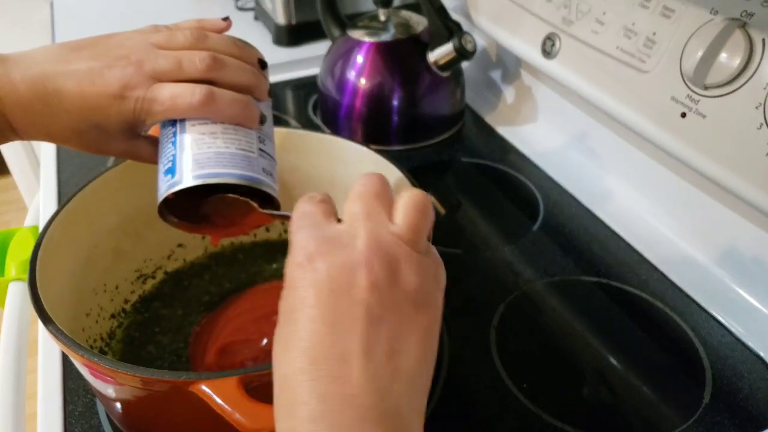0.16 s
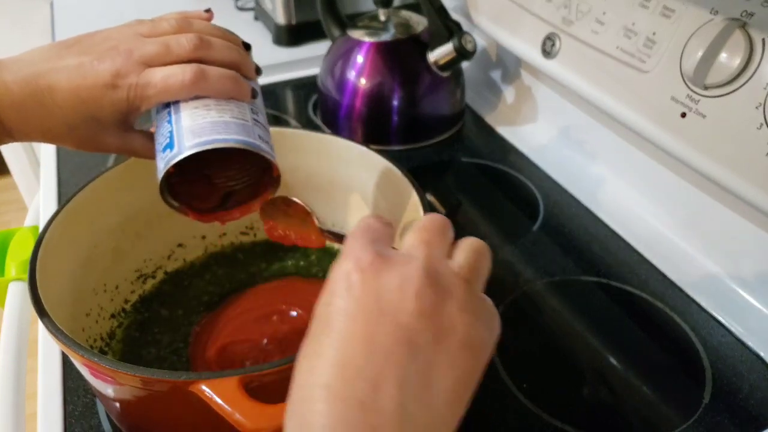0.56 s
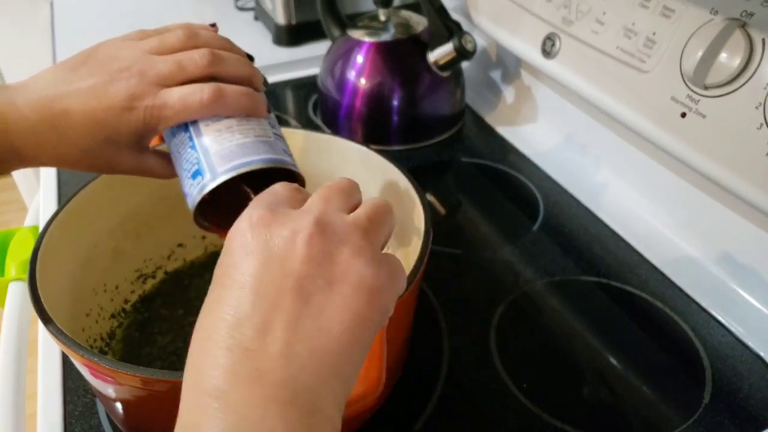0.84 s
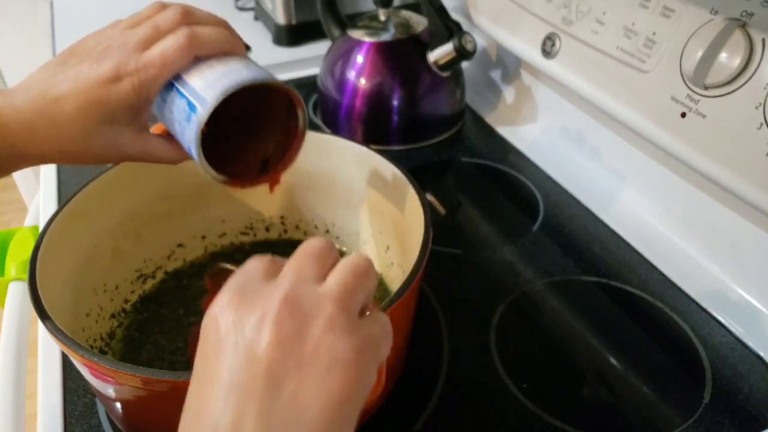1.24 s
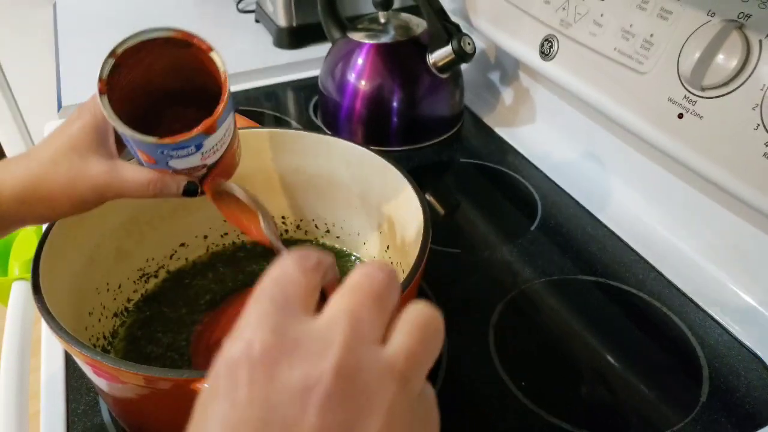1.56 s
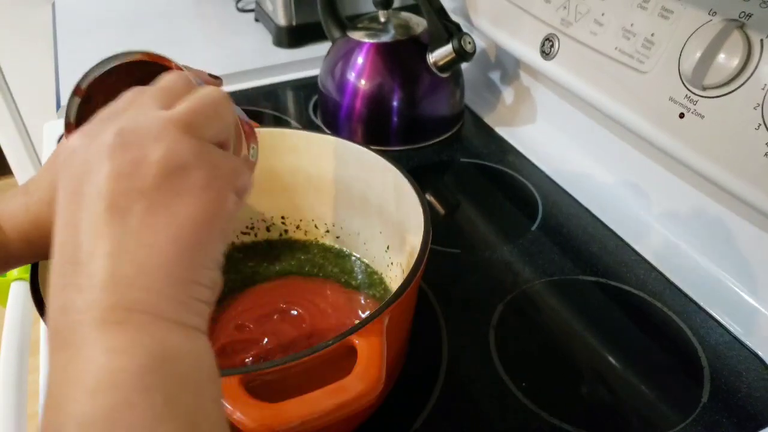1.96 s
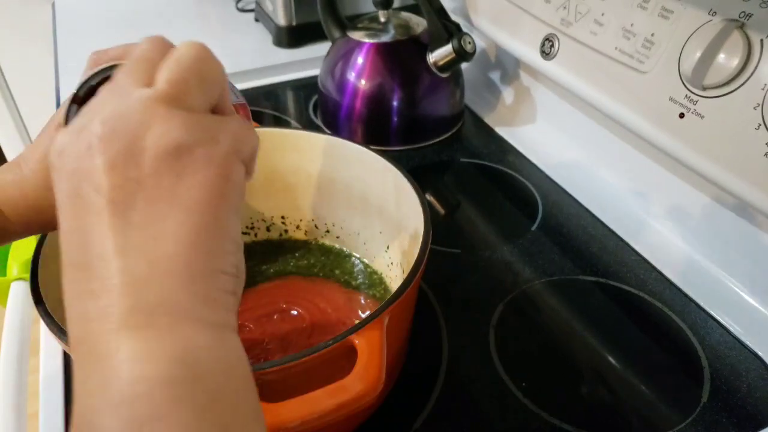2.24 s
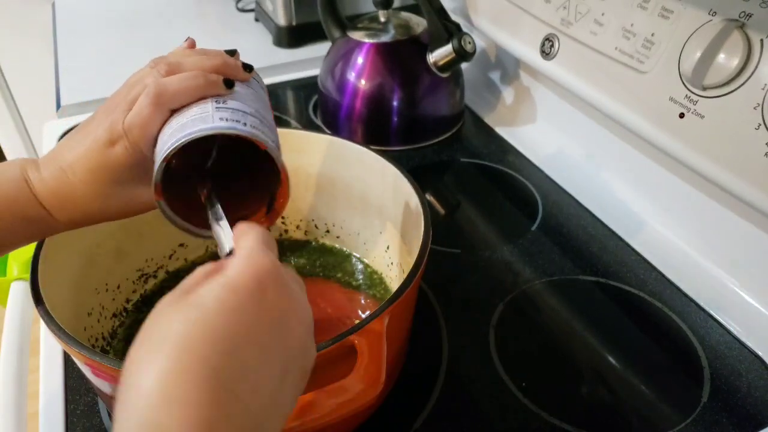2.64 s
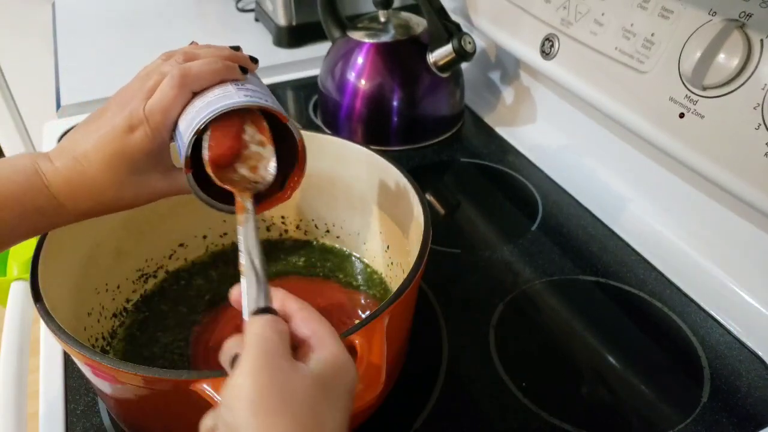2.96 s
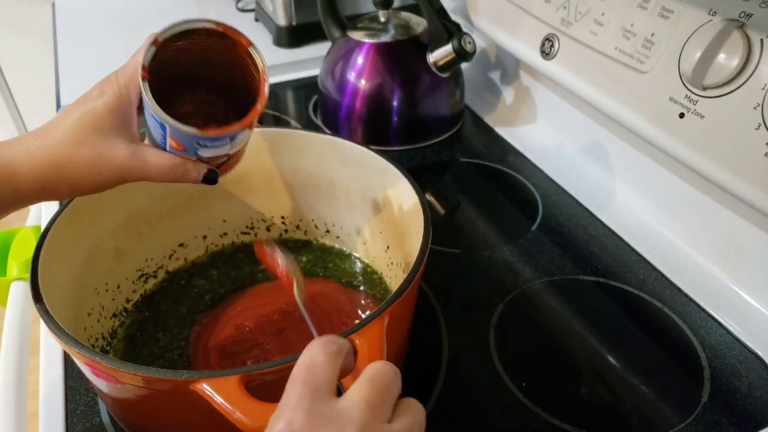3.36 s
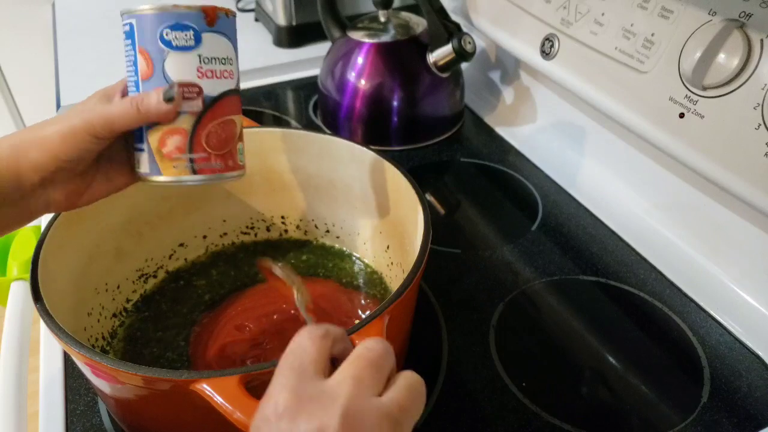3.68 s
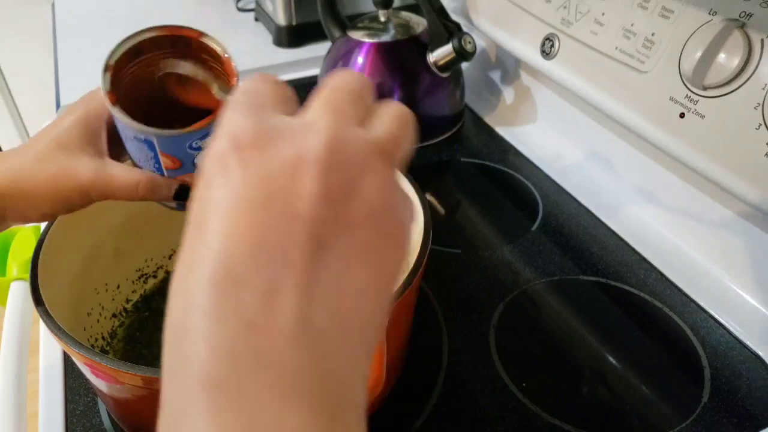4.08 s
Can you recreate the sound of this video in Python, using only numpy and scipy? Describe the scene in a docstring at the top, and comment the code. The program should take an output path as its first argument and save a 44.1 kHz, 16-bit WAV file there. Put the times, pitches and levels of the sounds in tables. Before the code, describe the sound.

In a small home kitchen, a spoon scrapes sauce from a tin can close to the microphone, with short gritty strokes and irregular hollow clinks. Strokes grow busier in the middle, with a brief rough squeal. After a pause, two much louder, bright clanks ring from an iron pot rim, then a final sharp knock on the can. Low stove hum and faint sizzle continue underneath.

```python
"""A spoon edge scrapes wet tin over a low stove hum and faint sizzle, while it also knocks about inside
a hand-held can. Strokes are random slips driving the can's resonances; knocks ring its modes, air column,
lid and wall. A short rough squeal comes midway. Later the spoon is rapped twice on the rim of an enamelled
iron pot, and one more can knock follows: wavering modes and clatter give the pot's ring and the thump of the
stove top. The stove is a wavering sine, coloured noise and pops; decaying noise adds a small kitchen."""
import sys
import numpy as np
from scipy import signal
from scipy.fft import rfft, irfft, next_fast_len
from scipy.io import wavfile
from scipy.ndimage import map_coordinates

SR = 44100
rng = np.random.default_rng(int(sys.argv[2]) if len(sys.argv) > 2 else 0)


def log_audio(samples):
    """Write samples as a 16-bit WAV file to the path given in sys.argv[1]."""
    # one column per channel
    frames = np.atleast_2d(samples).T
    # limit to full scale, then quantise
    limited = np.clip(frames, -1, 1)
    pcm = np.round(limited * 32767).astype(np.int16)
    wavfile.write(sys.argv[1], SR, pcm)


N = 185726  # length in samples

# Steady low sound of the stove: pitch_hz, relative density_db (per Hz)
STOVE_RUMBLE = [(15, -58), (25, -33), (40, -6), (56, 2.5), (78, -10.5), (104, -1), (140, -9.5),
                (220, -15.5), (330, -13), (465, -0.5), (620, -14), (800, -25), (970, -4.5), (1250, -32)]
# Fizz and pops of the hot pot: pitch_hz, relative density_db (per Hz)
POT_SIZZLE = [(300, -37), (1100, -9), (1450, 5.5), (1800, -2), (2500, 1), (4000, 0.5), (8000, -4.5),
              (13000, -4), (16000, -6.5)]
# Spoon dragged along the wall: start_s, length_s, strength_db, brightness_db (per octave), bareness_db
SPOON_STROKES = [(0, 0.037, -54, -1.5, 2.5), (.383, 0.059, -48.5, 1.5, -7.5), (.691, 0.17, -60, -0.5, 18),
                 (.775, .1, -50.5, 2.5, 4.5), (1.008, 0.055, -46.5, 0, -7), (1.198, 0.042, -41, -1.6, 5.5),
                 (1.954, 0.1, -41.5, 2, 2.5), (2.175, 0.053, -47, 0.5, 2), (2.345, .1, -45.5, -1.5, 1),
                 (2.449, 0.1, -55, 0.5, -2), (2.563, 0.138, -57.5, 1, 0), (2.683, 0.091, -47, 0, 0),
                 (2.76, 0.25, -52.5, -1.5, -6.5), (2.99, 0.088, -45, -0.5, -2.5),
                 (3.06, 0.061, -44.5, 2, -4)]
# Spoon edge over wet tin: pitch_hz, relative density_db (per Hz)
TIN_FRICTION = [(150, -3), (400, -4), (650, 3), (830, 0.5), (1150, -5), (1500, -5.5), (2500, 0), (4200, 2),
                (6000, -10.5), (9000, -7.5), (12500, -2.5), (16000, -13.5)]
# Can damped by hand and sauce: pitch_hz, relative level_db, t60_s (for knocks with a lifted spoon)
CAN_MODES = [(298, -7.5, 0.082), (471.4, -10.5, 0.18), (551, -10, 0.066), (649.2, 4, 0.11), (915, -6, 0.13),
             (986, -3.5, 0.087), (1117, 0, 0.035), (1154.4, -3, 0.16), (1930, -17, 0.2), (2175, -27, 0.2),
             (2244, -10.5, 0.21), (2484, -12.5, 0.2), (2880, -6.5, 0.18), (3340, -37, 0.052),
             (3568, -7, 0.1), (4156, -7.5, 0.065), (4580, -14, 0.06), (4950, -13, 0.015), (5580, -5, 0.063),
             (7310, -5.5, 0.07)]
# Spoon against the can; the air note is low when the spoon stays pressed on, high when it bounces off:
# start_s, strength_db, brightness_db (per octave), lid_db, air_hz, wall_hz (at the struck spot)
SPOON_KNOCKS = [(0.08, -32.5, 0.5, 0.5, 490, 1800), (0.13, -44.5, -4, -9, 600, 2950),
                (0.171, -47, -6.5, 2.5, 475, 2300), (0.682, -38, 3, -4, 664, 1893),
                (0.799, -44, -1, -10, 678, 1844), (0.875, -49, -2.2, -4.5, 487, 1750),
                (1.003, -51.5, -4.5, -3, 664, 2720), (1.151, -40.5, 0, -4.5, 675, 3020),
                (1.38, -73.5, 9, -10, 517, 2380), (1.953, -46, 2.5, -15, 667, 2153),
                (1.999, -41, 0.5, -24, 462, 2360), (2.035, -27.5, 3, 1, 456, 2322),
                (2.113, -34.5, -0.3, -9, 681, 1890), (2.161, -38, 0.3, -3.5, 737, 2396),
                (2.338, -41.5, -0.9, -7, 685, 2260), (2.409, -41.5, 3.1, -10, 648, 2015),
                (2.448, -41, 0.5, -14, 648, 1826), (2.535, -45, -1.5, -27, 477, 1880),
                (2.549, -39.5, 4, -30, 449, 1813), (2.688, -48, 2, -33, 670, 2425),
                (2.952, -49.5, -.3, -29, 683, 2180), (3.292, -81, 10, 2, 470, 2400),
                (4.185, -24.5, 0.5, -5, 668, 2970)]
# Partials of the struck wall: multiple of the wall note, relative level_db
STRUCK_WALL = [(0.998, 3), (1.971, 6.5)]
# Dense short-lived modes under the can's clear ones: pitch_hz, relative density_db (per Hz)
TIN_CLATTER = [(100, -8.5), (300, 1.5), (600, 7), (800, -2), (1100, -18), (1500, -8), (2200, -8), (4200, 2),
               (5500, -4), (9000, -4), (13000, 0.5), (16000, -4)]
# Rough squeal of the edge near one pitch: start_s, length_s, pitch_hz, level_db
EDGE_SQUEAK = (2.5, 0.14, 1930, -47)
# Spoon on the pot rim: start_s, level_db, then thump_db, low_ring_db, ring_db, tick_db against that level
RIM_RAPS = [(3.512, -6.5, -21.5, -38, -13, -23), (3.715, -6, -19, -36.5, -13, -23)]
# Pot, stove top and spoon ringing together: pitch_hz, relative level_db, t60_s
POT_MODES = [(54, -18, .5), (153, -2, .15), (181, -3, .3), (203, -9, .55), (390, -8, .07), (465, -1, .09),
             (479, -12, .7), (530, -7, .09), (587.5, -11, .6), (877, -30, .8), (1120, -24, .25),
             (1771, -20, .42), (2062, -14.5, .78), (2268, -11.5, .52), (2707, -14, .17), (2766, -2, .26),
             (3227, -7, .17), (3400, -15, .35), (3510, -15, .3), (3742, 2, .08), (4064, -10, .14),
             (4588, -4, .15), (4812, -3, .11), (5133, -8, .2), (5400, -5, .07), (5580, -4, .09),
             (6214, 3, .13), (6727, -11, .2), (6900, -7, .17), (12500, -10, .09)]
# Dense short-lived modes under the pot's clear ones: pitch_hz, relative density_db (per Hz)
IRON_CLATTER = [(60, -10), (110, -8.5), (175, 8.5), (260, -10.5), (480, 8.5), (900, -13.5), (1900, -9.5),
                (2500, -4.5), (3500, 7.5), (4250, -5.5), (5400, 3.5), (6900, -4.5), (7700, -8.5),
                (12800, 2.5), (16000, -11.5)]
# Bands whose strength a contact sets: low_hz, high_hz
CONTACT_BANDS = [(40, 800), (800, 1400), (1400, 7000), (7000, 18000)]
# Likeness of left and right: pitch_hz, correlation (-1 to 1)
STEREO_LIKENESS = [(100, 0.95), (300, 0.76), (700, 0.83), (1400, 0.12), (3000, -0.17), (7000, -0.038),
                   (15000, 0.0051)]
# Decay of the kitchen: pitch_hz, t60_s
KITCHEN_DECAY = [(150, 0.99), (600, 0.49), (2000, 0.53), (5000, 0.36), (9000, 0.28), (15000, 0.2)]

TOP_HZ = 15850  # the band limit, where the gain is halved
PIVOT_HZ = 1330  # brightness tips the sound about this pitch
TICK_DB = -11  # top register of a knock
WALL_T60_S, WALL_TOP_HZ = 0.06, 5200  # the sauce damps any wall partial above this pitch
CREST, SWELL_DB = 0.69, 6  # a stroke presses hardest at this share of its length, this much over its ends
SING_DB, SING_GROWS, SING_WIDTH_HZ = 3, .55, 67  # wall notes under a stroke; they grow per dB of bareness
SLIPS_PER_S, JUDDER_DB, JUDDER_PER_S = 3500, 1.5, 260  # grit: mean slip rate, random level depth, points a second
HOLLOW_HZ, HOLLOW_WIDTH_HZ, HOLLOW_DB = 665, 56, 14  # the air in the can hums under every stroke
AIR_DB, AIR_T60_S = 7.5, 0.077  # the can's air column under a knock; the tables set its pitch
LID_HZ, LID_DB, LID_T60_S = 1183, 6.5, 0.043  # the lid that closes the can's bottom
LOADED_UNTIL_S, LOADED_PITCH = .3, .79  # the first heavy spoonful lowers the lid note by this ratio
PRESSED_BELOW_HZ, PRESSED_RING = 560, 0.62  # a lower air note means a pressed spoon: can t60 cut to this share
RING_WAVER, WAVER_PER_S = 0.24, 35.4  # pot modes waver randomly: depth as a share, random points a second


def amp(db):
    """Decibels to gain."""
    return 10 ** (np.asarray(db) / 20)


def unit(x):
    """Scale to rms 1."""
    return x / np.sqrt(np.mean(x ** 2) + 1e-20)


def along(points, hz):
    """Read (Hz, value) points on a log pitch axis."""
    f, value = np.transpose(points)
    return np.interp(np.log(hz + 1), np.log(f + 1), value)


def wobble(rate, size):
    """A smooth random curve through rate random points a second."""
    knots = rng.standard_normal(int(size * rate / SR) + 4)
    return map_coordinates(knots, [np.arange(size) * rate / SR])


def filtered(x, response):
    """Shape x by a complex response of frequency."""
    size = x.shape[-1]
    padded = next_fast_len(size + SR // 4)
    spectrum = rfft(x, padded) * response(np.fft.rfftfreq(padded, 1 / SR))
    return irfft(spectrum, padded)[..., :size]


def resonance(f, hz, width):
    """Causal response of one mode, with unity gain at its pitch."""
    return 1j * f * width / (hz * hz - f * f + 1j * f * width)


def stereo(pair, spectrum):
    """Colour two unrelated signals and blend them into left and right by likeness, rms 1."""
    def mid_side(f):
        turn = np.arccos(np.clip(along(STEREO_LIKENESS, f), -1, 1)) / 2
        return amp(along(spectrum, f)) * np.array([np.cos(turn), np.sin(turn)])

    mid, side = filtered(pair, mid_side)
    return unit(np.array([mid + side, mid - side]))


def noise(spectrum, size):
    """Coloured stereo noise of rms 1."""
    return stereo(rng.standard_normal((2, size)), spectrum)


def band(x, lo, hi):
    """Causal band-pass."""
    return signal.sosfilt(signal.butter(4, [lo, hi], 'band', fs=SR, output='sos'), x)


def ring(modes, t, detune, spread_db, lead_s, skew):
    """Damped modes at fresh strengths; left leads in phase by lead_s in the bass, skew scatters the highs."""
    hz, db, t60 = np.transpose(modes)[:, :, None]
    strength, drift = rng.standard_normal((2, len(modes), 1))
    phase, pattern = rng.uniform(-np.pi, np.pi, (2, len(modes), 1))
    hz = hz * (1 + detune * drift)
    fade = amp(db + spread_db * strength - 60 * t / t60)
    # tanh bounds the phase offset between the ears
    apart = np.tanh(np.pi * hz * lead_s + skew * pattern * hz / (hz + 2000))
    sides = [fade * np.sin(2 * np.pi * hz * t + phase + side * apart) for side in (1, -1)]
    return np.array([np.sum(side, axis=0) for side in sides])


def contact(blow, levels_db):
    """The point of contact sets how strongly each register answers in the first 20 ms."""
    parts = [band(blow, lo, hi) for lo, hi in CONTACT_BANDS]
    return sum(amp(db) * part / np.std(part[:, :SR // 50]) for part, db in zip(parts, levels_db))


def tipped(brightness, centres_hz):
    """Level change in dB of each register: a hard contact favours the high ones, a soft one the low."""
    return brightness * np.log2(np.array(centres_hz) / PIVOT_HZ)


def wall_partials(s):
    """(Hz, dB) of the wall where the spoon last landed by time s; before any knock, the first spot serves."""
    # 5 ms of grace takes in a knock that starts together with a stroke
    landed = [hz for start, *_, hz in SPOON_KNOCKS if start < s + .005] or [SPOON_KNOCKS[0][-1]]
    return [(k * landed[-1], db) for k, db in STRUCK_WALL if k * landed[-1] < WALL_TOP_HZ]


def add(track, s, sound):
    """Mix a sound into the track at time s."""
    start = max(round(s * SR), 0)
    track[:, start:start + sound.shape[1]] += sound[:, :max(N - start, 0)]


def kitchen(x, wet_db, gap_s=0.0028):
    """Add a fresh noise tail in which each frequency dies at its own speed, as in a small room."""
    hz, t, z = signal.stft(noise([(100, 0), (16000, 0)], SR // 2), SR, nperseg=256)
    fade = amp(-60 * t / along(KITCHEN_DECAY, hz)[:, None])
    tail = signal.istft(z * fade, SR, nperseg=256)[1]
    # the tail swells in just after the direct sound
    tail = tail * (1 - np.exp(-(np.arange(tail.shape[1]) / SR / gap_s) ** 2))
    echo = signal.fftconvolve(x[:1], tail / np.linalg.norm(tail[0]), axes=1)
    return x + amp(wet_db) * echo[:, :x.shape[1]]


def stove(rumble_db=-56.5, hum_db=-66, hum_hz=58, sizzle_db=-59.5, pops_per_s=90, pops_db=-73):
    """A wavering low sine and a hollow noise rush, under the fizz and tiny random pops of the hot pot."""
    t = np.arange(N) / SR
    hum_level = amp(hum_db + 0.41 * wobble(5.1, N)) * np.sqrt(2)
    hum = hum_level * np.sin(2 * np.pi * hum_hz * t + .5 * wobble(8.4, N))
    fizz = amp(sizzle_db + 0.086 * wobble(7.4, N)) * noise(POT_SIZZLE, N)
    clicks = (rng.random(N) < pops_per_s / SR) * rng.standard_normal((2, N))
    pops = amp(pops_db) * stereo(clicks, POT_SIZZLE)
    return amp(rumble_db) * noise(STOVE_RUMBLE, N) + hum + fizz + pops


def scrapes(modes_db=15, hiss_db=-6, wet_db=-10.5):
    """The edge catches and slips; slips hiss and excite the can's modes. Bare tin sings, sauce damps it."""
    out, t = np.zeros((2, N)), np.arange(int(.6 * SR)) / SR
    registers = [(200, 1400), (1400, 6500), (6500, 18000)]  # hollow, wall, hiss in Hz

    def body(f):
        # a t60 becomes a bandwidth
        return sum(amp(db) * resonance(f, hz, np.log(1000) / np.pi / t60) for hz, db, t60 in CAN_MODES)

    for start, length, db, brightness, bare_db in SPOON_STROKES:
        # pressure builds to the crest, then eases until the spoon lifts off
        touching = np.interp(t, [0, .006, length, length + .008], [0, 1, 1, 0])
        swell_db = np.interp(t, [0, min(CREST, 1) * length, length], [-SWELL_DB, 0, -SWELL_DB])
        pressure = touching * amp(swell_db)
        slips = (rng.random((2, len(t))) < SLIPS_PER_S / SR) * rng.standard_normal((2, len(t)))
        judder = amp(JUDDER_DB * wobble(JUDDER_PER_S, len(t)))
        rub = stereo(slips * judder * pressure, TIN_FRICTION)
        sing_db = SING_DB + SING_GROWS * bare_db
        partials = wall_partials(start)

        def tin_response(f):
            wall = sum(amp(sing_db + p_db) * resonance(f, hz, SING_WIDTH_HZ) for hz, p_db in partials)
            hollow = amp(HOLLOW_DB) * resonance(f, HOLLOW_HZ, HOLLOW_WIDTH_HZ)
            return 1 + amp(modes_db) * body(f) + hollow + wall

        tin = filtered(rub, tin_response)
        levels_db = db + np.array([0, bare_db, hiss_db]) + tipped(brightness, centres_hz=[650, 3000, 11000])
        voice = sum(amp(level) * unit(band(tin, lo, hi)) for level, (lo, hi) in zip(levels_db, registers))
        add(out, start, kitchen(np.sqrt(np.mean(pressure ** 2)) * voice, wet_db))
    return out


def can_knocks(clatter_db=1, clatter_t60=0.082, crack_db=10.5, crack_t60=0.032, chatter_s=0.00086,
               attack_s=0.0014, wet_db=-11.5):
    """Each knock rings the can's modes, air column and lid, and the wall at the spot where the spoon lands."""
    out, t = np.zeros((2, N)), np.arange(int(.4 * SR)) / SR
    for s, db, brightness, lid_db, air_hz, _ in SPOON_KNOCKS:
        lid_hz = LID_HZ * (LOADED_PITCH if s < LOADED_UNTIL_S else 1)
        notes = [(air_hz, AIR_DB, AIR_T60_S), (lid_hz, LID_DB, LID_T60_S)]
        notes += [(*partial, WALL_T60_S) for partial in wall_partials(s)]
        held = PRESSED_RING if air_hz < PRESSED_BELOW_HZ else 1
        can = [(hz, mode_db, held * t60) for hz, mode_db, t60 in CAN_MODES]
        modes = ring(can + notes, t, detune=.005, spread_db=1.5, lead_s=.00016, skew=.12)
        clatter = amp(clatter_db - 60 * t / clatter_t60)
        crack = amp(crack_db - 60 * np.maximum(t - chatter_s, 0) / crack_t60)
        rattle = (clatter + crack) * noise(TIN_CLATTER, len(t))
        blow = (modes + rattle) * (1 - np.exp(-t / attack_s))
        # registers: air column, lid, wall, tick
        tilt_db = tipped(brightness, centres_hz=[500, 1100, 3500, 11000])
        levels_db = db + np.array([0, lid_db, 0, TICK_DB]) + tilt_db
        add(out, s, kitchen(contact(blow, levels_db), wet_db))
    return out


def squeak(width_hz=90, wet_db=-21.0):
    """The edge squeals on bare tin: noise through a doubled resonance gives a rough, narrow pitch."""
    start, length, hz, db = EDGE_SQUEAK
    t = np.arange(SR // 2) / SR
    pair = filtered(rng.standard_normal((2, len(t))), lambda f: resonance(f, hz, width_hz) ** 2)
    touching = np.interp(t, [0, .006, length, length + .02], [0, 1, 1, 0])
    out = np.zeros((2, N))
    add(out, start, kitchen(amp(db) * touching * unit(pair), wet_db))
    return out


def pot_raps(clatter_db=10, clatter_t60=0.042, chatter_s=0.0089, attack_s=0.0017, gain_db=0):
    """The spoon chatters on the rim for a few milliseconds, then the heavy pot rings on, each mode wavering."""
    out, t = np.zeros((2, N)), np.arange(SR) / SR
    for s, level_db, *register_db in RIM_RAPS:
        modes = np.zeros((2, len(t)))
        for mode in POT_MODES:
            waver = 1 + RING_WAVER * wobble(WAVER_PER_S, len(t))
            modes += ring([mode], t, detune=0, spread_db=1, lead_s=0, skew=.4) * waver
        # the clatter holds level while the spoon chatters, then dies
        fade = amp(clatter_db - 60 * np.maximum(t - chatter_s, 0) / clatter_t60)
        blow = (modes + fade * noise(IRON_CLATTER, len(t))) * (1 - np.exp(-t / attack_s))
        levels_db = gain_db + level_db + np.array(register_db)
        add(out, s, kitchen(contact(blow, levels_db), wet_db=-11))
    return out * amp([[-.6], [.6]])  # leans right


def scene():
    """Stove under everything, the can leaning slightly left, the pot leaning right."""
    can = (scrapes() + can_knocks() + squeak()) * amp([[.2], [-.2]])
    return stove() + can + pot_raps()


def record(dry):
    """A steep low-pass leaves next to nothing above the band limit."""
    return filtered(dry, lambda f: 1 / (1 + (f / TOP_HZ) ** 160))


dry = scene()
out = record(dry)
log_audio(out)
```